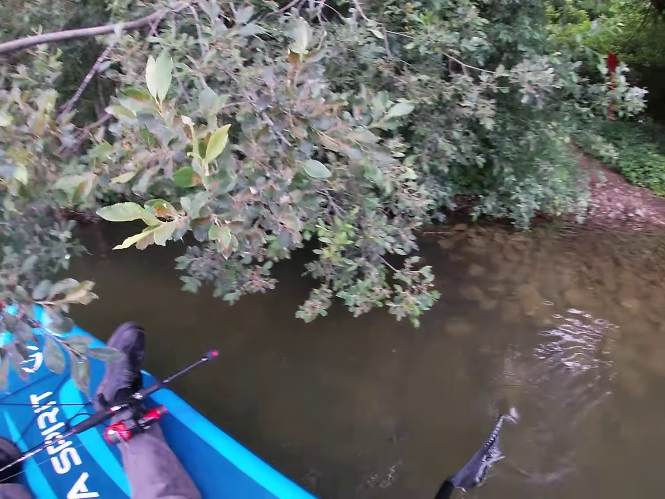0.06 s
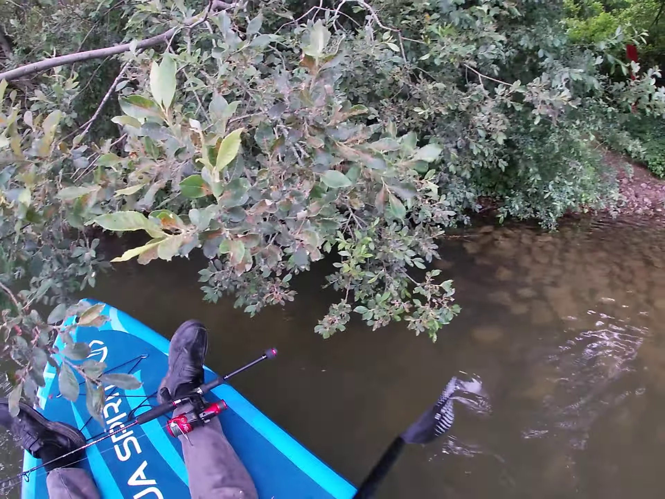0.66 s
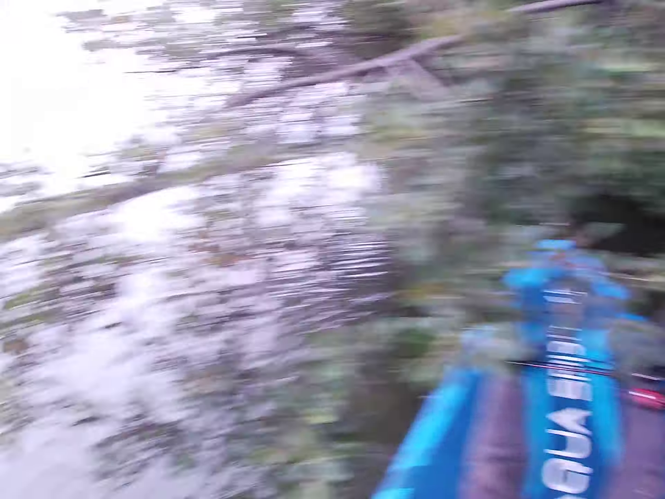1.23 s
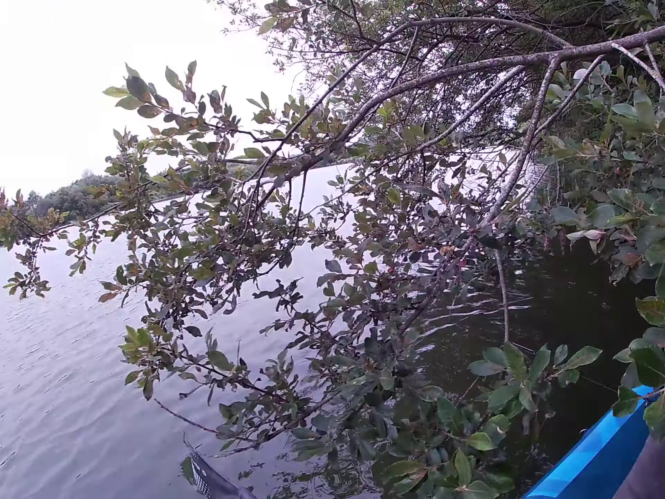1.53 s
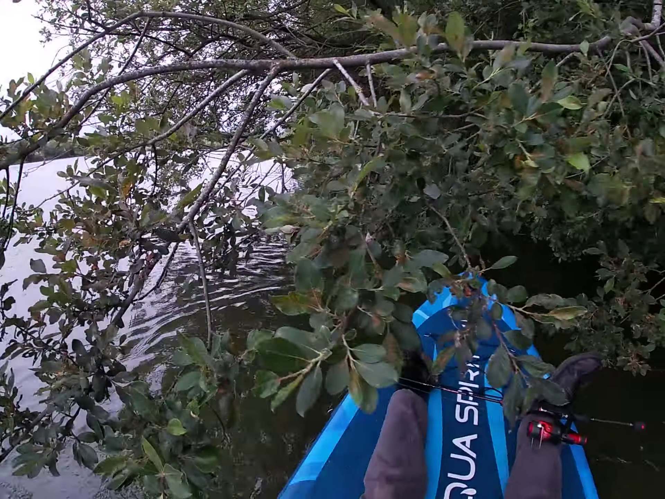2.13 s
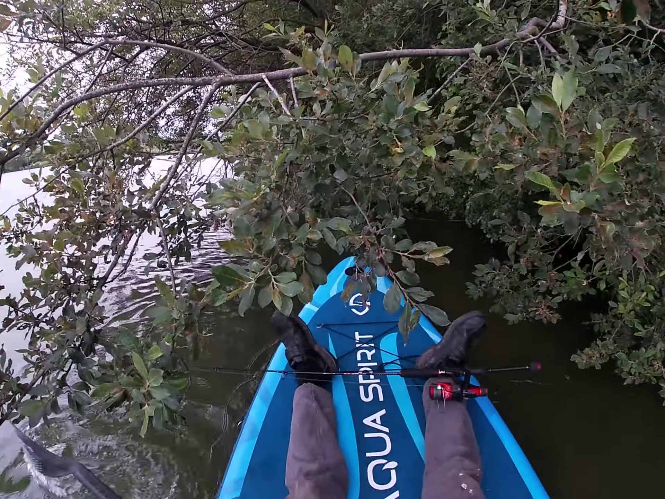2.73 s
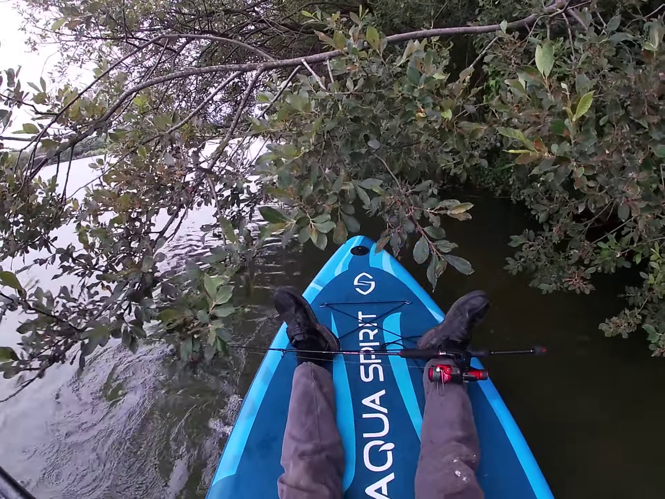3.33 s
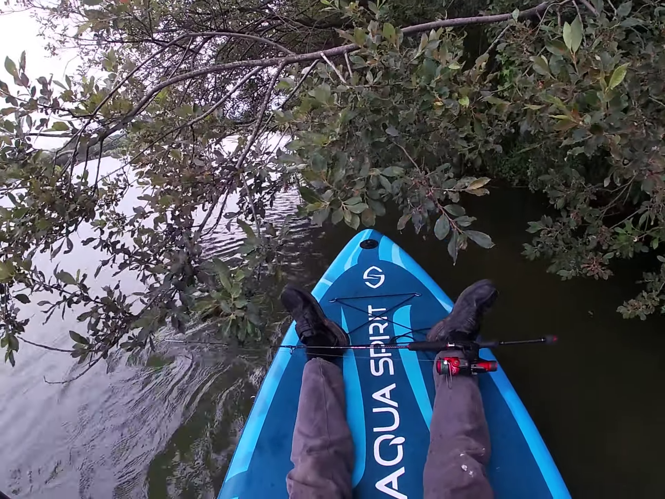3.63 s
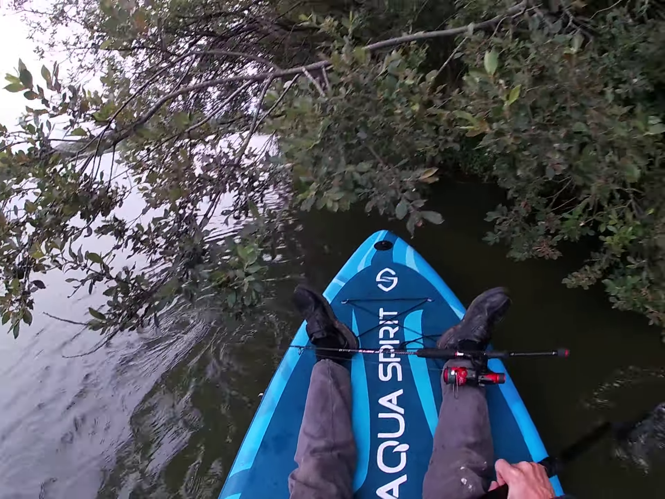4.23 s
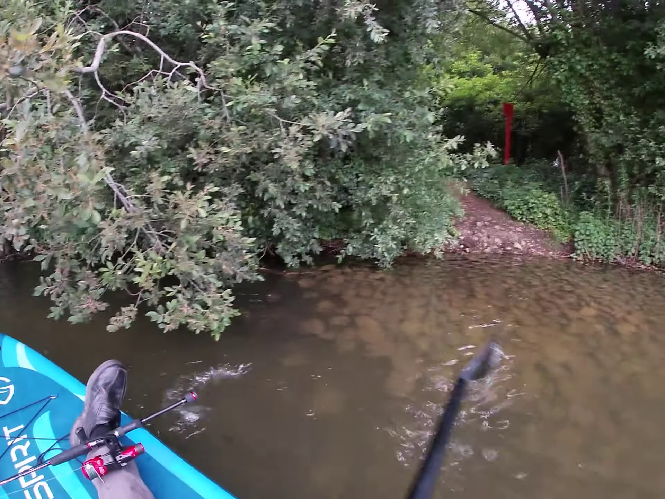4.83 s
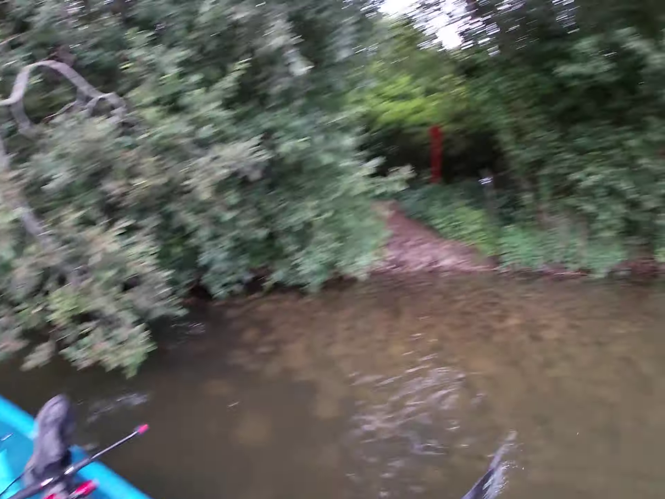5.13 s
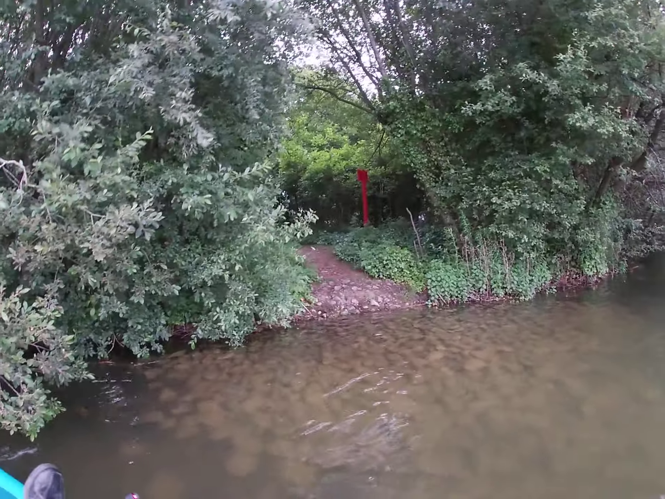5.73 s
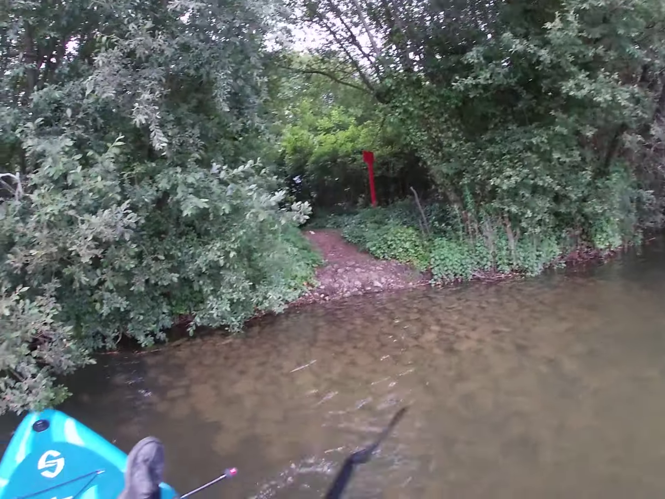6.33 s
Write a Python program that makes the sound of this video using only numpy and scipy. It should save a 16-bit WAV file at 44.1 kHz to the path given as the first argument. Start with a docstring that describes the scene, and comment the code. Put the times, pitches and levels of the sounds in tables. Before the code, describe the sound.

A paddle splashes and gurgles through calm lake water in two close strokes, with drips and wind rumbling on the microphone.

```python
"""A calm lake, on a paddle board, with a small microphone close to the water: two paddle strokes.
The blade churns air into the water, where it rings as bubbles; spray and drips patter back between strokes.
Wind buffets the microphone. From far off, thin whistles, mostly falling, like a bird,
carry over the hush of the shore."""
import sys
import numpy as np
from scipy import signal
from scipy.fft import rfft, irfft
from scipy.io import wavfile
from scipy.ndimage import uniform_filter1d

SR = 44100
rng = np.random.default_rng(int(sys.argv[2]) if len(sys.argv) > 2 else 0)


def put_to_file(sound):
    """Save the sound as 16-bit audio at rate SR, in the file named by the first command-line argument."""
    columns = np.atleast_2d(sound).T  # one column per channel
    safe = np.clip(columns, -1, 1)
    whole_steps = np.round(safe * 32767)
    wavfile.write(sys.argv[1], SR, whole_steps.astype(np.int16))


N = 285327
TIME = np.arange(N) / SR
STEPS = np.arange(0, N, 32) / SR  # coarse clock for envelopes, t/s


def amp(db):
    """Decibels to gain."""
    return 10 ** (np.asarray(db) / 20)


def unit(x):
    """Scales to rms 1."""
    return x / np.sqrt(np.mean(x ** 2) + 1e-20)


def add(mix, s, sound):
    """Mixes a sound in at time s."""
    part = mix[max(round(s * SR), 0):][:len(sound)]
    part += sound[:len(part)]


def colour(x, spectrum):
    """Minimum-phase filter whose gain follows (f/Hz, level/dB) points."""
    hz, db = np.transpose(spectrum)
    bin_hz = abs(np.fft.fftfreq(4096, 1 / SR))
    log_gain = np.log(amp(np.interp(np.log(bin_hz + 1), np.log(hz), db)))
    response = np.exp(np.conj(signal.hilbert(log_gain)))
    return signal.oaconvolve(x, np.fft.ifft(response).real)[:N]


def drift(rate_hz):
    """A random wander of rms 1, up to about the given rate."""
    hz = np.fft.rfftfreq(N, 1 / SR)
    return unit(irfft(rfft(rng.standard_normal(N)) * np.exp(-(hz / rate_hz) ** 2), N))


def steadied(x, size):
    """Evens out the level over stretches of size samples and keeps the finer grain."""
    power = uniform_filter1d(uniform_filter1d(x ** 2, size), size)
    return x / np.sqrt(abs(power) + 1e-12)


def hump(middle, length):
    """A smooth swell and fall of height 1."""
    return np.exp(-(2 * (STEPS - middle) / length) ** 2)


def burst(start, rise_s, hold_s, fall_s):
    """Rises to 1, holds until hold_s after the start, then dies away."""
    age = STEPS - start
    return np.clip(age / rise_s, 0, 1) * np.exp(-np.maximum(age - hold_s, 0) / fall_s)


def echo(x, t60):
    """Diffuse reflections, about as strong as x in total, that fall 60 dB in t60 seconds."""
    t = TIME[:SR]
    tail = rng.standard_normal(SR) * np.exp(-np.log(1000) * t / t60) * (t > .001)
    return signal.oaconvolve(x, tail / np.linalg.norm(tail))[:N]


# Spectrum of the distant shore: f/Hz, level/dB
SHORE_SPECTRUM = [(30, -25), (180, 10.5), (400, -2.5), (630, -6.5), (1000, -4.5), (2000, -14),
                  (2700, -17.5), (4000, -18), (6300, -17), (15000, -39.5)]


def shore(level_db=-48.5):
    """The steady hush of trees and open water, far off."""
    swell_db = .5 * drift(2)
    return amp(level_db + swell_db) * unit(colour(rng.standard_normal(N), SHORE_SPECTRUM))


# Pressure of the breeze at the microphone, between gusts: t/s, level/dB
BREEZE_PRESSURE = [(0, -43), (0.5, -52.5), (0.9, -38.5), (1.15, -52), (1.55, -33.5), (2.0, -49), (2.4, -39),
                   (3.5, -40.5), (4.3, -41.5), (6.47, -44.5)]
# Gusts at the microphone: middle t/s, length/s, level/dB
WIND_GUSTS = [(0.12, 0.11, -28), (0.273, 0.066, -27), (0.736, 0.17, -36), (1.324, 0.085, -14),
              (1.38, 0.23, -27.5), (1.884, 0.16, -36.5), (2.068, 0.067, -32), (2.22, 0.2, -29.5),
              (2.6, 0.096, -29), (2.811, 0.02, -32.5), (3.092, 0.2, -33.5), (3.904, 0.053, -29.5),
              (4.038, 0.078, -33.5), (4.246, 0.097, -33), (4.506, 0.063, -34.5), (4.664, 0.2, -34.5),
              (5.06, 0.091, -29), (5.156, 0.037, -21), (5.248, 0.1, -32), (5.4, 0.095, -28),
              (5.489, 0.11, -28), (5.834, 0.13, -30.5), (6.413, 0.072, -36)]


def wind_pressure():
    """Gusts swell and pass on top of the breeze; in dB."""
    breeze = amp(np.interp(STEPS, *np.transpose(BREEZE_PRESSURE)))
    power = breeze ** 2 + sum((amp(db) * hump(s, length)) ** 2 for s, length, db in WIND_GUSTS)
    return np.interp(TIME, STEPS, 10 * np.log10(power))


# Spectra of the large and the small eddies at the microphone port: f/Hz, level/dB
RUMBLE_SPECTRUM = [(8, -10), (25, 0.5), (48, -0.5), (90, -5.5), (150, -13.5), (230, -20), (350, -34),
                   (700, -63.5), (2000, -48.5), (6000, -72)]
EDGE_SPECTRUM = [(60, 12), (130, 8.5), (220, 3), (330, 2), (450, -8.5), (900, -17.5), (3000, -105)]
# Hard buffets, right on the diaphragm: middle t/s, level/dB, f/Hz, length/s
WIND_BUFFETS = [(1.304, -20.5, 195, 0.014), (1.311, -14, 81, 0.014), (1.344, -11.5, 57.6, 0.023),
                (2.158, -25.5, 125, 0.035), (2.229, -23.5, 84.5, 0.047), (2.592, -26, 120, 0.029),
                (5.16, -28, 66, 0.052)]


def wind(level_db=-2.0, flutter_db=2.5, ceiling_db=-24, edge_db=3):
    """Eddies rumble at the microphone port; buffets shove the diaphragm for a few swings."""
    pressure_db = wind_pressure()
    rumble = colour(rng.standard_normal(N), RUMBLE_SPECTRUM) * amp(flutter_db * drift(22))
    out = amp(level_db + np.minimum(pressure_db, ceiling_db)) * steadied(rumble, size=2200)
    # faster air sheds smaller eddies, so a rougher edge grows with the square of the pressure
    edge = steadied(colour(rng.standard_normal(N), EDGE_SPECTRUM), size=1500)
    out += amp(edge_db + 2 * pressure_db) * edge
    for s, db, hz, length in WIND_BUFFETS:
        t = np.arange(-length / 2, length / 2, 1 / SR)
        shove = np.cos(np.pi * t / length) ** 2 * np.cos(2 * np.pi * hz * t)
        add(out, s - length / 2, amp(db) * shove)
    return out


# Wavelets and run-off around the board: middle t/s, length/s, level/dB of churn, spray, mist
BOARD_LAPS = [(0.745, 0.33, -55.5, -61.5, -80), (1.165, 0.39, -51, -56, -73.5),
              (1.767, 0.22, -49, -59.5, -92), (2.882, 0.51, -44, -46.5, -73.5),
              (3.394, 0.13, -46.5, -51, -75.5), (3.655, 0.53, -44.5, -51.5, -80),
              (3.885, 0.42, -50, -52, -66), (4.882, 0.25, -49.5, -58, -74.5),
              (6.201, 0.58, -48.5, -54, -78)]
# Paddle strokes, close by: blade in t/s, pull length/s, level/dB of churn, spray, mist
PADDLE_STROKES = [(2.067, 0.52, -34, -47, -74.5), (3.987, 0.71, -42, -46.5, -75)]
# Water breaking over the blade or the board: t/s, level/dB of churn, spray, mist
BLADE_SPLASHES = [(2.072, -51.5, -61, -81), (2.108, -53, -41, -61), (2.148, -68, -38, -79),
                  (2.209, -42.5, -36.5, -66), (2.282, -34, -33.5, -61), (2.363, -36.5, -64, -84),
                  (2.528, -33, -80, -68), (2.608, -32, -46, -66.5), (2.688, -36.5, -56, -82),
                  (2.83, -40, -46, -71), (2.918, -61, -51, -61), (3.066, -46, -44, -69),
                  (3.277, -38, -51.5, -75), (3.692, -51, -48.5, -58.5), (3.765, -55, -59, -73),
                  (4.019, -33, -45, -60), (4.122, -32, -41.5, -66), (4.318, -36.5, -60, -70),
                  (4.555, -35, -55, -72), (4.614, -45, -42, -64), (4.701, -39, -41, -72),
                  (5.25, -73, -54, -64), (5.671, -53, -50, -97), (5.828, -68, -56, -69.5),
                  (6.175, -59, -55, -71), (6.27, -47.5, -62, -60.5)]


def stirring(layer):
    """Level and vigour (0 to 1) of churn (layer 0), spray (1) or mist (2) as the water is stirred."""
    ripple_db = (-58, -65.5, -102)[layer]  # the lake never quite rests
    catch_s = (0.19, 0.009, 0.028)[layer]  # the blade throws spray before it drags air under
    laps = [amp(db[layer]) * hump(s, length) for s, length, *db in BOARD_LAPS]
    strokes = [amp(db[layer]) * burst(s, catch_s, hold_s=length, fall_s=0.018)
               for s, length, *db in PADDLE_STROKES]
    splashes = [amp(db[layer]) * burst(s, rise_s=0.0065, hold_s=0.0065, fall_s=0.047)
                for s, *db in BLADE_SPLASHES]
    power = amp(ripple_db) ** 2 + sum(part ** 2 for part in strokes + splashes + laps)
    level = np.interp(TIME, STEPS, np.sqrt(power))
    return level, np.sqrt(level / level.max())


def bubble(hz, t60, rise, onset_cycles=0.71):
    """A pocket of air rings as a dying sine; its pitch slides as it nears the surface or changes shape."""
    t = np.arange(int(t60 * SR) + 20) / SR
    swell = 1 - np.exp(-(hz * t / onset_cycles) ** 2)
    decay = np.exp(-np.log(1000) * t / t60)
    return swell * decay * np.sin(2 * np.pi * hz * t * (1 + rise * t / t60 / 2))


def bubble_cloud(per_s, low_hz, high_hz, cycles, spread_db, sizes):
    """Random bubbles, mostly faint, born at a rate per_s that may vary in time."""
    births = np.flatnonzero(rng.random(N) < per_s / SR)
    strength = amp(spread_db * np.minimum(rng.exponential(1, N), 3.5))
    size = rng.integers(0, sizes, N)
    ring_cycles = cycles * np.exp(rng.uniform(-1, 1, sizes))
    rises = rng.uniform(-.1, .8, sizes)
    rings, cloud = [], np.zeros(N)
    for hz, life, rise in zip(np.geomspace(low_hz, high_hz, sizes), ring_cycles, rises):
        ring = bubble(hz, life / hz, rise)
        rings.append(ring * np.sqrt(hz) / np.linalg.norm(ring))  # even energy per Hz
    for n in births:
        add(cloud, n / SR, strength[n] * rings[size[n]])
    return unit(cloud)


# Spectrum of churned water, close by: f/Hz, level/dB
CHURN_SPECTRUM = [(100, -28.5), (270, 0.5), (480, 2.5), (800, 2), (1300, 0.5), (2000, -7), (3200, -14),
                  (6000, -7), (15000, -18)]


def churn(level_db=-4, lumps_db=0.36):
    """Air dragged under gurgles in foam as crowded bubbles, more of them the harder the blade pulls."""
    level, vigour = stirring(layer=0)
    gurgle = bubble_cloud(1400 * vigour, 250, 3250, cycles=25, spread_db=3.2, sizes=90)
    foam = amp(-6.5) * rng.standard_normal(N)
    water = steadied(colour(gurgle + foam, CHURN_SPECTRUM), size=2000)
    return amp(level_db + lumps_db * drift(39)) * level * water


# Spectrum of spray landing near the microphone: f/Hz, level/dB
SPRAY_SPECTRUM = [(400, -23), (1400, -4), (2400, 2), (3500, -1), (4800, -4.5), (6400, -5.5), (8000, -26),
                  (15000, -12.5)]


def spray(level_db=-0.36, clumps_db=1.6):
    """Droplets fall in clumps and trap tiny bubbles: tinkles on calm water, a fizz when it is stirred."""
    level, vigour = stirring(layer=1)
    tinkle = bubble_cloud(3600 * vigour ** 1.5, 1400, 10100, cycles=30, spread_db=4, sizes=90)
    fizz = amp(2.5) * vigour * rng.standard_normal(N)
    water = steadied(colour(tinkle + fizz, SPRAY_SPECTRUM), size=2000)
    return amp(level_db + clumps_db * drift(20.6)) * level * water


# Spectrum of the finest droplets, close by: f/Hz, level/dB
MIST_SPECTRUM = [(3000, -54), (5500, -8.5), (8000, -7.5), (10000, -11.5), (15000, -29)]


def mist(level_db=12, fizz_db=-2, clumps_db=3.0):
    """The finest droplets leave pinhead bubbles that prickle on the surface."""
    level, vigour = stirring(layer=2)
    prickle = bubble_cloud(1000 * vigour, 5500, 14000, cycles=32, spread_db=4.5, sizes=50)
    fizz = amp(fizz_db) * rng.standard_normal(N)
    water = steadied(colour(prickle + fizz, MIST_SPECTRUM), size=4000)
    return amp(level_db + clumps_db * drift(61)) * level * water


# Bubbles and drips nearest the microphone: t/s, f/Hz, level/dB, ring/cycles, relative pitch rise
NEAR_BUBBLES = [(0.0645, 2570, -36, 22, -0.2), (0.121, 3320, -35, 17, 1.3), (0.264, 2580, -22, 15.6, -0.22),
                (0.297, 4740, -27, 40, -0.005), (0.388, 3440, -29, 18, -0.21),
                (0.402, 1490, -35.5, 29, -0.24), (0.502, 2180, -42, 57, 0.21),
                (0.538, 2270, -30.5, 57, -0.32), (0.775, 1470, -38.5, 28, 0), (0.8, 2400, -40, 65, 0.063),
                (1.004, 2900, -28, 13, 0.11), (1.049, 3870, -36, 30, 0.11), (1.0765, 2760, -36, 34, -0.13),
                (1.095, 2960, -25, 22, -0.15), (1.136, 5100, -38, 130, -0.57),
                (1.142, 2110, -31.5, 37, 0.15), (1.204, 2220, -38, 55, -0.17), (1.222, 4130, -38, 55, 0.13),
                (1.236, 1220, -28.5, 27, 0.43), (1.264, 1210, -20, 11.4, -0.25),
                (1.471, 1605, -40, 48, 0.1), (1.753, 3470, -30, 36, -0.24), (1.836, 4400, -29.5, 22, -0.16),
                (1.964, 3100, -30, 34, 0.057), (2.047, 2750, -20.5, 22, 0.75), (2.054, 4720, -6, 21, 0.93),
                (2.08, 5970, -25, 55, 0.085), (2.11, 5740, -26, 70, -0.049), (2.122, 5900, -24, 55, -0.21),
                (2.129, 2850, -20.5, 22, 0.4), (2.1402, 4900, -22, 35, -0.082), (2.14, 2700, -25, 30, 0.11),
                (2.156, 5100, -17, 20, 0.8), (2.157, 3400, -24, 30, -0.095), (2.213, 2340, -26, 80, -1.5),
                (2.217, 1120, -25, 32, -0.3), (2.231, 2430, -21.5, 35, 0.11), (2.261, 4470, -28, 30, 0.68),
                (2.278, 5600, -20, 38, -0.2), (2.287, 4300, -7, 15, 0.58), (2.292, 2480, -18, 27, -0.14),
                (2.292, 630, -34, 20, -0.55), (2.316, 3400, -21, 24, 0.2), (2.318, 690, -24, 17, 0.25),
                (2.365, 1230, -20, 21, -0.13), (2.3716, 4870, -17.5, 14, 0.52),
                (2.38, 458, -24.5, 27, 0.28), (2.389, 3900, -26, 46, -0.72), (2.384, 670, -26, 32, 0.1),
                (2.39, 1290, -21, 22, 0.1), (2.397, 1068, -23.5, 41, 1.6), (2.396, 810, -16, 17, 0.91),
                (2.456, 5550, -29.5, 36, 0.33), (2.467, 2330, -28, 29, 0.3), (2.504, 945, -24.5, 24, 0.15),
                (2.522, 2800, -30, 26, 0.39), (2.5358, 1610, -15.5, 17, -0.43),
                (2.537, 3300, -18.5, 14, -0.031), (2.538, 1190, -18.5, 42, 0.38),
                (2.537, 780, -17.5, 15, -0.055), (2.582, 1027, -34, 33, 0.099),
                (2.598, 4430, -12.5, 9, 0.19), (2.603, 660, -25.5, 17, 0.91), (2.61, 1043, -26.5, 45, 1.0),
                (2.622, 2510, -12, 19, 0.2), (2.647, 2700, -25.5, 34, 0.61), (2.692, 447, -26, 11, 0.44),
                (2.693, 255, -20, 17, -1.03), (2.747, 2910, -32.5, 28, 0.2),
                (2.828, 4940, -18.5, 27, -0.17), (2.869, 2460, -30, 28, 0.2), (2.924, 4940, -25, 42, 0.44),
                (2.949, 2330, -32, 57, 1.1), (2.96, 2380, -26, 24, 0.08), (2.99, 5060, -34, 32, 0.1),
                (3.011, 2500, -28.5, 40, 0.72), (3.069, 4600, -21, 19, -0.094),
                (3.071, 1880, -30, 24, 0.11), (3.11, 3660, -31.5, 39, 0.04), (3.078, 1700, -23, 14, 0.52),
                (3.268, 433, -29.5, 21, 0.22), (3.286, 2120, -28.5, 28, -0.04), (3.295, 710, -25, 13, 0.41),
                (3.405, 9150, -34, 30, 0), (3.406, 1060, -31, 45, -0.18), (3.53, 8900, -36, 30, -0.18),
                (3.574, 1310, -28, 37, 0.94), (3.619, 2400, -17.5, 7.6, 0.041), (3.623, 1440, -30, 28, 0.2),
                (3.628, 3700, -24, 18, -0.12), (3.636, 1650, -29, 24, 0.081),
                (3.658, 2830, -16.5, 9.2, 0.31), (3.692, 6960, -27.5, 36, -0.29),
                (3.702, 9000, -28, 14, 0.26), (3.711, 3800, -27, 47, 0.049), (3.711, 6150, -38, 34, 0.28),
                (3.729, 2100, -32, 40, -0.11), (3.772, 4450, -32, 38, 0.1), (3.7733, 8800, -29, 35, 0),
                (3.828, 5850, -28.5, 40, 0.88), (3.871, 4600, -24.5, 21, -0.54),
                (3.87, 1890, -26.5, 43, 0.038), (3.893, 1440, -32.5, 38, 0.0016),
                (3.901, 5530, -24.5, 27, 0.1), (3.959, 1840, -31, 28, -0.024),
                (4.021, 5400, -19, 26, 0.016), (4.032, 3320, -10, 7.2, 0.15),
                (4.045, 1444, -20.5, 34, 0.15), (4.05, 564, -33, 30, 0.97), (4.106, 508, -21.5, 22, 0.21),
                (4.14, 1180, -19.5, 25, 0.39), (4.148, 5000, -24, 30, 0.52), (4.151, 3880, -29, 36, 0.46),
                (4.158, 1750, -23.5, 34, 0.67), (4.188, 6200, -29, 40, 0.36), (4.206, 2620, -29, 43, -0.12),
                (4.167, 2280, -21.5, 32, -0.1), (4.2648, 6360, -24.5, 78, -0.1),
                (4.2645, 8750, -24, 25, -0.49), (4.276, 1420, -29.5, 70, 1.2), (4.285, 2030, -41, 63, 1.4),
                (4.32, 1745, -30, 71, 0.15), (4.378, 1900, -18, 11.5, 0.39), (4.337, 786, -30, 25, -0.0008),
                (4.395, 592, -30.5, 63, 0.12), (4.411, 3800, -26.5, 32, 0.015), (4.424, 4350, -25, 30, 0.2),
                (4.439, 3780, -24, 28, -0.057), (4.4501, 473, -17, 11.4, -0.016),
                (4.452, 292, -30, 35, 0.096), (4.468, 160, -26, 20, -0.52), (4.5005, 2370, -23, 27, -0.043),
                (4.529, 5200, -13, 15, -0.25), (4.537, 3880, -25.5, 25, 0.2), (4.565, 2040, -28, 34, -0.02),
                (4.58, 2180, -29, 69, 0.75), (4.607, 3000, -33, 55, 0.3), (4.649, 3720, -24, 37, 0.15),
                (4.653, 2320, -32.5, 58, 0.6), (4.67, 540, -24.5, 16, -0.2), (4.718, 1670, -27, 17, -0.73),
                (4.728, 1660, -26.5, 20, -0.092), (4.866, 5380, -19, 8.1, 0.16),
                (4.8657, 10000, -25.5, 17, 0.18), (4.87, 3540, -30, 24, 0.1), (5.022, 5460, -34, 37, -0.09),
                (5.26, 5700, -14.5, 17.4, -0.31), (5.663, 1454, -26.5, 44, 0.15),
                (5.679, 830, -35, 32, 0.21), (5.7, 1036, -39.5, 56, 0.22), (5.75, 5470, -23.5, 12.5, 0.24),
                (5.768, 830, -33.5, 32, -0.26), (5.819, 591, -29.5, 40, -0.15), (5.821, 423, -29, 21, 0.16),
                (5.838, 3430, -31, 56, 0), (5.84, 2880, -29, 57, -0.041), (5.841, 6800, -31, 40, 0),
                (5.855, 248, -35, 15, -0.67), (6.014, 1450, -38.5, 93, 0.81),
                (6.063, 4650, -23.5, 39, 0.22), (6.1235, 4050, -31.5, 32, -0.065),
                (6.129, 2070, -39.5, 50, -0.18), (6.132, 1060, -38.5, 52, -0.21),
                (6.179, 3250, -25.5, 21, -0.24), (6.185, 1560, -35, 68, -0.38),
                (6.274, 6850, -35, 19, -1.1), (6.276, 9800, -29, 12, -0.072),
                (6.286, 2030, -41.5, 130, 0.78)]
# Spectrum of the surface breaking: f/Hz, level/dB
SPLAT_SPECTRUM = [(60, -39), (200, 3), (800, 2), (5000, 3.5), (8000, -18), (15000, -11)]


def plops(level_db=0, splat_db=-23, splat_s=0.0019, lead_s=0.0015):
    """The surface breaks with a brief splat, and the trapped air rings just after."""
    rings, splats = np.zeros(N), np.zeros(N)
    t = TIME[:SR // 40]
    splat_shape = t / splat_s * np.exp(1 - t / splat_s)
    for s, hz, db, cycles, rise in NEAR_BUBBLES:
        add(rings, s, amp(db) * bubble(hz, cycles / hz, rise, onset_cycles=0.99))
        add(splats, s - lead_s, amp(db) * rng.standard_normal(len(t)) * splat_shape)
    return amp(level_db) * (rings + amp(splat_db) * colour(splats, SPLAT_SPECTRUM))


# Whistles from far off: t/s, length/s, start f/Hz, end f/Hz, level/dB, relative pitch quaver
FAR_WHISTLES = [(0.67, 0.14, 3480, 2830, -58, 0.045), (0.802, 0.15, 2720, 2580, -55.5, 0.025),
                (1.306, 0.048, 3465, 3280, -52, 0.021), (1.364, 0.19, 2900, 2420, -55.5, 0.043),
                (1.929, 0.12, 3240, 2810, -52.5, 0.061), (2.602, 0.16, 6300, 5780, -52, 0.012),
                (5.442, 0.1, 2530, 3050, -58, 0.055), (5.486, 0.19, 5950, 5180, -59, 0.011),
                (5.958, 0.073, 3560, 3250, -55, 0.05), (6.385, 0.08, 3290, 3420, -58, 0.023)]


def whistles(direct_db=-5, trees_db=-2):
    """Thin, quavering notes glide, mostly down, and level off, smeared by echoes among far trees."""
    out, waver = np.zeros(N), drift(300)
    for s, length, start_hz, end_hz, db, quaver in FAR_WHISTLES:
        progress = np.linspace(0, 1, int(length * SR))
        glide_hz = end_hz + (start_hz - end_hz) * (1 - progress) ** 2
        hz = glide_hz * (1 + quaver * waver[int(s * SR):][:len(progress)])
        level = amp(db) * signal.windows.tukey(len(progress), .3)
        add(out, s, level * np.sin(2 * np.pi * np.cumsum(hz) / SR))
    return amp(direct_db) * out + amp(trees_db) * echo(out, t60=0.73)


# Water closing behind the blade, beside the board: middle t/s, level/dB, length/s
BLADE_SLOSHES = [(2.718, -41.5, 0.21), (4.069, -39.5, 0.21), (4.462, -38, 0.13), (5.907, -44.5, 0.22)]
# Spectrum of a slosh: f/Hz, level/dB
SLOSH_SPECTRUM = [(80, -23), (170, 4.5), (300, 15), (520, 2), (900, -5), (3000, -79)]


def sloshes():
    """The hollow behind the blade collapses in a soft, low rush."""
    swell = np.zeros(N)
    for s, db, length in BLADE_SLOSHES:
        add(swell, s - length / 2, amp(db) * np.hanning(int(length * SR)))
    return swell * steadied(colour(rng.standard_normal(N), SLOSH_SPECTRUM), size=1500)


# The blade's air pocket pinching off, close by: t/s, f/Hz, level/dB, length/s, relative pitch change
BLADE_GULPS = [(4.102, 769, -24, 0.02, -0.097), (4.1943, 845, -24.5, 0.022, -0.17)]


def gulps(rise_s=0.00025):
    """A large air pocket wobbles as its neck closes: it rings on while its pitch settles, then stops."""
    out = np.zeros(N)
    wobble, shudder = 1 + .05 * drift(200), amp(2 * drift(250))
    for s, hz, db, length, change in BLADE_GULPS:
        t = TIME[:int(2 * length * SR)]
        span = slice(round(s * SR), round(s * SR) + len(t))
        pitch = hz * (1 + change * np.tanh(2 * t / length)) * wobble[span]
        level = amp(db) * (1 - np.exp(-t / rise_s)) * np.exp(-(t / length) ** 4) * shudder[span]
        add(out, s, level * np.sin(2 * np.pi * np.cumsum(pitch) / SR))
    return out


def reflections(water, board_db=-13, bank_db=-24):
    """Board and paddler scatter a short echo of the water; the wooded bank adds a faint, longer one."""
    return water + amp(board_db) * echo(water, t60=0.1) + amp(bank_db) * echo(water, t60=1.0)


def scene():
    """Water close by, the shore far off, and wind on the microphone."""
    water = reflections(churn() + gulps() + sloshes() + spray() + mist() + plops())
    return (water + wind() + shore() + whistles())[None]


# Response of the small microphone: f/Hz, level/dB
MICROPHONE_RESPONSE = [(20, 2.5), (6600, -0.5), (7200, -1), (7900, -6), (9800, -6.5), (11300, -15),
                       (12300, -9.5), (15500, -26)]


def record(dry):
    """One small microphone, dull in the top octave and cut off above 15.7 kHz."""
    heard = colour(dry[0], MICROPHONE_RESPONSE)
    lowpass = signal.firwin(511, 15700, window=("kaiser", 9), fs=SR)
    return signal.oaconvolve(heard, lowpass, "same")[None]


dry = scene()
out = record(dry)
put_to_file(out)
```